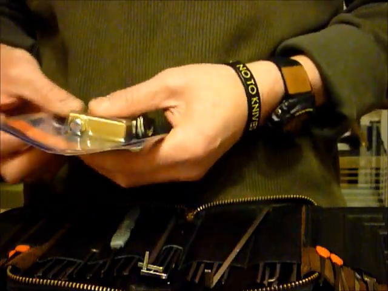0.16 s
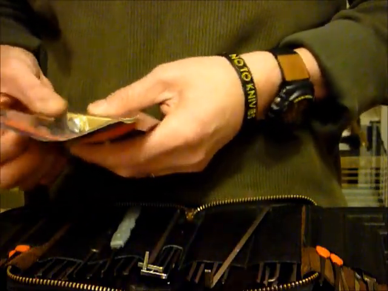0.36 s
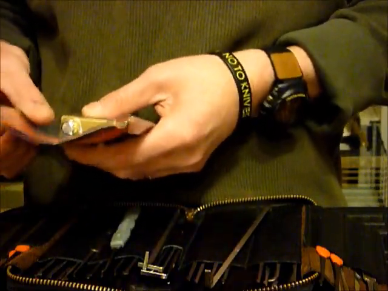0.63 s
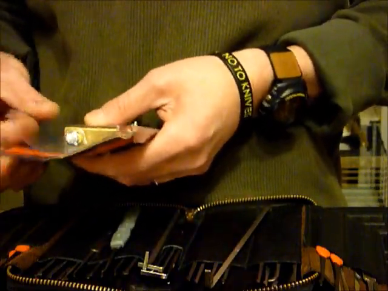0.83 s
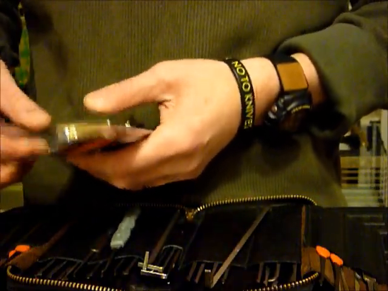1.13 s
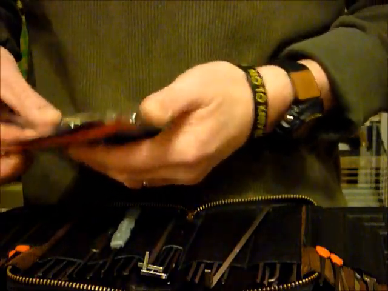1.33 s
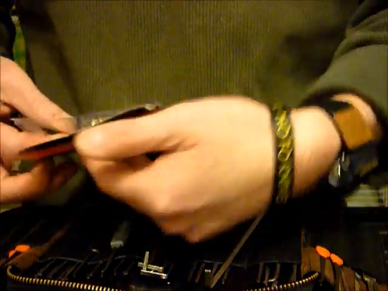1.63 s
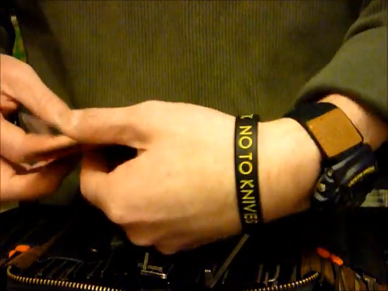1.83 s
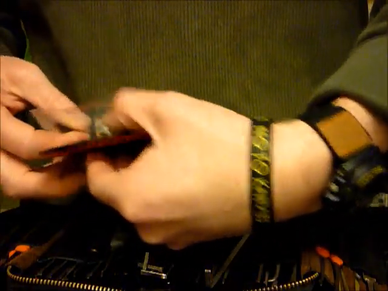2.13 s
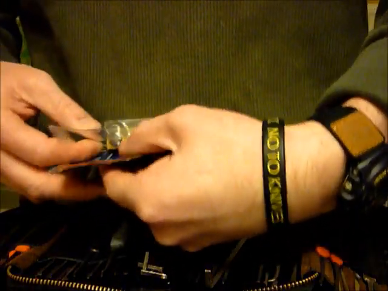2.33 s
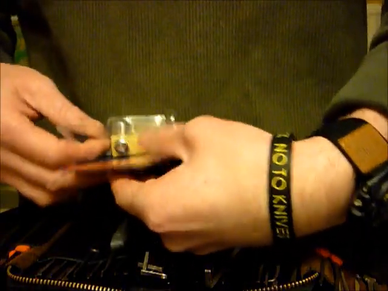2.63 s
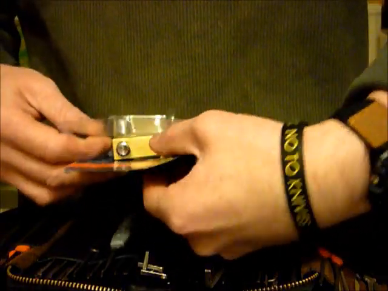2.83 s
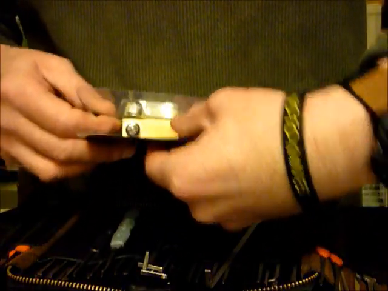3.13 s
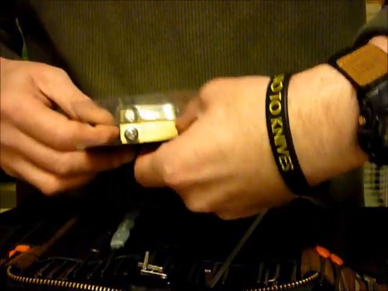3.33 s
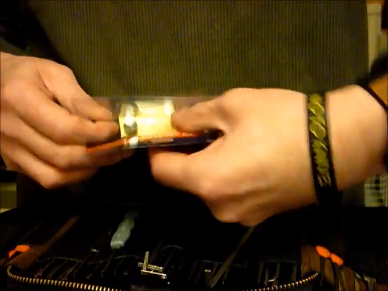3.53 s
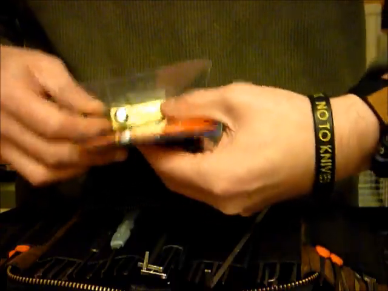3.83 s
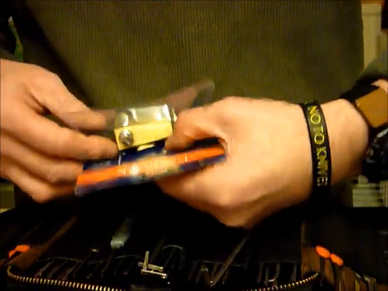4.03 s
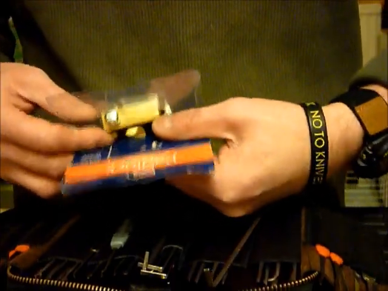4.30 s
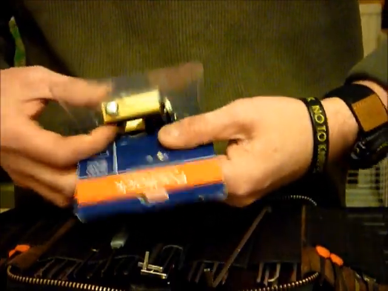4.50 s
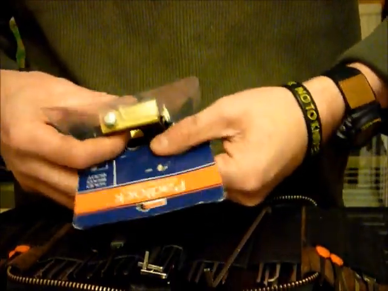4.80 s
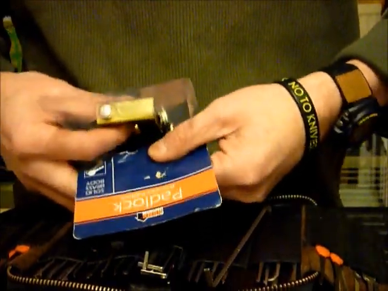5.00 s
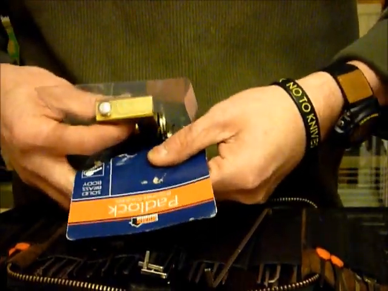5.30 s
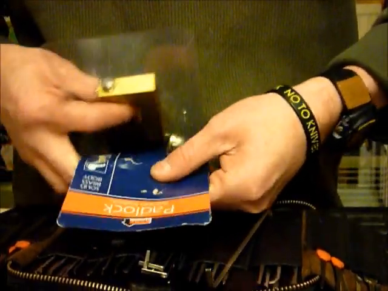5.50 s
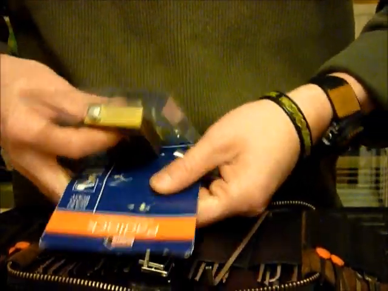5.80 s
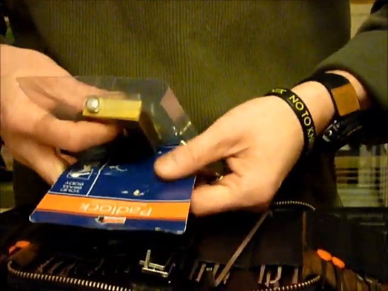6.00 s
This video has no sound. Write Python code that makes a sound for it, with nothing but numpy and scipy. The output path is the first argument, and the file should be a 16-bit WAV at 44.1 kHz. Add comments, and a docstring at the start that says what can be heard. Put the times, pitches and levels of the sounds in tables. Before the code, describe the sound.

Hands work a metal padlock out of a stiff plastic pack, heard close in a small room with a low, steady hush. For the first two seconds the shell gives light, scattered snaps, and the lock knocks hollowly on the card backing over faint finger rubbing. A hard crack with a knock lands at 2.5 seconds, followed by a brief lull. From 3.5 seconds the handling gets busier: a sharp snap and knock at 3.6, then short gritty scrapes, fine crackling and frequent clicks and bumps. Another strong snap comes at 5.1 seconds, and the loudest cracks arrive around 5.5, trailed by quick smaller snaps and scraping. From 5.6 to 6 seconds the lock slides free, its metal squeaking thin and high against the plastic edge. One soft knock ends it just after 6 seconds.

```python
"""Two hands work a padlock out of its blister pack, close up in a small, hushed room.
First the stiff plastic shell buckles in scattered snaps and the heavy lock knocks on the backing card.
A hard crack lands at 2.5 s; from 3.5 s the snaps crowd in and the plastic scrapes and crackles under
the fingers. The biggest cracks come near 5.5 s, then the lock slides free, its metal singing thinly
against the plastic edge, and one soft knock ends it."""
import sys
import numpy as np
from scipy import signal
from scipy.fft import rfft, irfft, next_fast_len
from scipy.io import wavfile

SR = 44100
rng = np.random.default_rng(int(sys.argv[2]) if len(sys.argv) > 2 else 0)


def wrap_up_sound(samples):
    """Save the sound to the file named by the first command line argument, as 16-bit audio."""
    columns = np.atleast_2d(samples).T
    # keep every value between -1 and 1, then stretch to whole-number steps
    tamed = np.clip(columns, -1, 1)
    steps = np.round(tamed * 32767).astype(np.int16)
    wavfile.write(sys.argv[1], SR, steps)


N = 271215
TIME = np.arange(N) / SR

# Table levels are relative. Tone curves of room hush, skin rub and fine crackle: f/Hz, level/dB
HUSH_EQ = [(30, -14.5), (55, -12), (136, -6.5), (232, -5.5), (525, -12), (800, -19), (1330, -17.5),
           (3000, -25), (8200, -30)]
RUB_EQ = [(120, -27.5), (300, 3), (550, 4), (800, 7.5), (1200, -6), (2000, -10.5), (4000, -39)]
CRACKLE_EQ = [(900, -2), (1800, -3), (3000, -1), (4500, -9.5), (6500, -11.5), (8000, -3)]
# the room's tail: f/Hz, level/dB, t60/s
ROOM_TAIL = [(180, -10, 0.48), (400, -6.5, 0.19), (890, -1, 0.25), (2060, -1, 0.36), (4100, -10, 0.29),
             (7600, -4, 0.34)]
# early reflections off hands and table: delay/s, level/dB
REFLECTIONS = [(.0016, -41), (.0058, -29), (.0074, -19), (0.02, -19)]
# resonances of the thin shell: f/Hz, width/Hz, boost/dB
SHELL_PEAKS = [(496, 990, 2), (2130, 410, 1.5), (4190, 3700, 13), (6270, 1400, 4)]
# modes of the card with the shell on it: f/Hz, level/dB, t60/s
CARD_MODES = [(213, -8, 0.064), (280, -3.5, 0.11), (423, -2, 0.3), (508, -2, 0.33), (629.4, -6.5, 0.35),
              (785, 2.5, 0.017), (769.3, 2.5, 0.058), (824, 5, 0.02), (1040, -23, 0.044), (1250, 10, 0.026),
              (1486, -6, 0.29), (2064, 5.5, 0.11)]
# crossovers bounding the thump, low, mid and high bands: f/Hz
CROSSOVERS_HZ = [110, 300, 1100, 3300, 8000]
# fader moves for the fingers shifting on the pack: t/s, rub/dB, crackle/dB
FINGER_LEVELS = [(0.0, -45, -52.5), (1.03, -50, -55), (1.35, -52, -55.5), (2.62, -49, -53), (3.0, -56, -58),
                 (3.54, -53.5, -62), (3.7, -46.5, -47.5), (4.02, -48, -51.5), (4.13, -39.5, -51),
                 (4.4, -54, -52.5), (5.14, -41, -52.5), (5.26, -57.5, -55), (5.48, -47, -54),
                 (5.62, -33.5, -49), (5.7, -56, -56), (5.84, -47, -46), (6.03, -56.5, -53),
                 (6.15, -75, -81)]
# plastic slides on the card: middle t/s, half length/s, level/dB, brightness/dB, panel f/Hz
SLIDES = [(0.297, 0.019, -53, -2, 2960), (0.408, 0.023, -57, 4.5, 1410), (0.6, 0.009, -59, -8, 1000),
          (0.893, .007, -52, -1, 2960), (0.929, 0.0065, -53, -13, 2960), (1.531, 0.011, -57, 8.5, 6140),
          (2.829, 0.0029, -53, -9, 2200), (3.171, 0.0081, -57, -19, 1100),
          (3.527, 0.012, -41.5, -1.5, 2800), (3.603, 0.0094, -43, -6, 2900), (3.799, 0.049, -49, -6, 2980),
          (3.93, 0.018, -50.5, -14, 3080), (4.079, 0.017, -37, -2.5, 3330), (4.126, 0.016, -48, -8, 3400),
          (4.309, 0.0086, -45, -8, 2120), (4.566, 0.0079, -48.5, -8, 2800), (4.633, .01, -45.5, -0.5, 2550),
          (5.006, 0.0083, -48, 0.5, 1390), (5.463, 0.0054, -41.5, -12, 2300),
          (5.492, 0.015, -35.5, 5, 2320), (5.594, 0.037, -42.5, 2, 3420), (5.806, 0.006, -45.5, -9, 2400),
          (5.863, 0.019, -48.5, 3, 2410)]
# stick-slip strokes on the lock's metal: t/s, length/s, f/Hz, level/dB, roughness/0-1
METAL_STROKES = [(5.605, 0.067, 7500, -50, 0.6), (5.705, 0.087, 7460, -48, 0.25),
                 (5.848, 0.045, 7540, -41.5, 0.6), (5.651, 0.077, 5700, -54.5, 0.5),
                 (5.885, 0.044, 5690, -55, 0.06), (5.953, 0.06, 5680, -60, 0.04),
                 (5.97, 0.046, 7520, -60, 0.2)]
# the lock bumps the card: t/s, level/dB, thump/dB, click/dB, knock f/Hz
LOCK_BUMPS = [(0.7185, -14, -29, -8, 520), (0.944, -8.5, -12, -6.5, 407), (1.9376, -17.5, -6, -6, 770),
              (1.945, -21, -17, -16, 780), (2.1442, -15.5, 3, -4, 640), (2.156, -15.5, -16, -11, 720),
              (2.504, 0, -1.5, -5, 1130), (2.507, -4, -17, -15, 410), (2.66, -13.5, -16, -6.5, 750),
              (3.6193, 3.5, -14.5, -13.5, 520), (3.6275, -0.5, -29, -14, 540), (4.2198, -6, -6, -12.5, 600),
              (4.557, -18, 2.5, -7, 540), (4.6697, -16, 7.5, -10, 400), (4.708, -19.5, 2.5, -19, 550),
              (4.9239, -10.5, -0.5, -6, 530), (5.111, -13.5, -11, -9.5, 720), (5.128, -10, -24, -14, 770),
              (5.224, -10, -30, -15, 780), (5.518, 5.5, -38, -7, 540), (6.0462, -20.5, -26, -9.5, 760)]
# the shell buckles: t/s, level/dB, brightness/dB, share to the card/dB, slip time/s, panel f/Hz
BUCKLES = [(0.0771, -22.5, -4.5, -0.5, 0.0024, 2950), (0.4681, -15.5, 6, -2, 0.001, 4000),
           (0.712, -9.5, -12, 1.5, 0.0032, 2900), (0.9388, -16.5, 6.5, 0, 0.0013, 2950),
           (1.1249, -24, -3, -4, 0.0084, 1430), (1.6003, -23, -9, -12, .002, 2220),
           (2.2726, -24, -4, -17, 0.0024, 1520), (2.504, 1.5, 7, -6, 0.0012, 1770),
           (2.7181, -20.5, -2, -9, 0.0023, 1490), (3.6043, -18, -7, -12, .0021, 1770),
           (3.6344, -2.5, 3.5, -18, 0.002, 3550), (3.7768, -14.5, -8, -1, 0.001, 2560),
           (3.9551, -18.5, -32, -9, .0022, 3080), (4.2112, -16, 5, -7, 0.0024, 3220),
           (4.2274, -9.5, -0.5, 0.5, 0.0028, 2960), (4.292, -17, -5, -6, 0.0022, 2070),
           (4.5155, -12.5, -3, -39, 0.0012, 2750), (4.5674, -13, -6, -5.5, 0.00082, 3400),
           (4.6694, -16.5, -6, -20, 0.00024, 3160), (4.6978, -18, -10, -10, .0018, 3540),
           (4.7764, -18.5, -0.5, -20, 0.00073, 4140), (5.0157, -15, -2, 5, 0.0017, 1350),
           (5.127, 2, -6, -1, 0.00088, 2080), (5.2428, -17.5, -3.5, -2, 0.0034, 2170),
           (5.4399, -19, 1, -1, 0.00094, 2340), (5.4726, 7.5, -6, 3.5, 0.0015, 2190),
           (5.5144, 8, 5, -8, 0.00077, 4570), (5.6338, -5, -9, 6.5, 0.0014, 3300),
           (5.654, -12.5, -8, 1, 0.00095, 1710), (5.681, -11.5, -8, -19, 0.0024, 1710),
           (5.7197, -6.5, -11, -27, 0.001, 1740), (5.8316, -13, -14, -6, 0.00091, 2420),
           (5.8586, -9, -21, -2, .0015, 2500)]


def from_db(db):
    """Decibels to gain."""
    return 10 ** (np.asarray(db) / 20)


def rms_one(x):
    """Scale to rms 1."""
    return x / np.sqrt(np.mean(x ** 2) + 1e-20)


def unit_energy(x):
    """Scale to a sum of squares of 1."""
    return x / np.sqrt(np.sum(x ** 2) + 1e-20)


def add(out, start_s, sound):
    """Drop a short sound onto the track."""
    at = max(round(start_s * SR), 0)
    out[at:at + len(sound)] += sound[:max(N - at, 0)]


def band(x, low_hz, high_hz):
    """Causal band-pass."""
    return signal.sosfilt(signal.butter(2, [low_hz, high_hz], "band", fs=SR, output="sos"), x + 1e-18)


def four_bands(x):
    """Split into thump, lows, mids and highs."""
    return [band(x, low, high) for low, high in zip(CROSSOVERS_HZ, CROSSOVERS_HZ[1:])]


def boost(x, hz, width_hz, db):
    """A bell boost: one resonance stands out."""
    return x + (from_db(db) - 1) * signal.lfilter(*signal.iirpeak(hz, hz / width_hz, fs=SR), x)


def equalise(x, curve):
    """Apply a tone curve, silent above its last point; rms 1."""
    hz, db = np.transpose(curve)
    size = next_fast_len(N)
    bins = np.maximum(np.fft.rfftfreq(size, 1 / SR), 1)
    gain = from_db(np.interp(np.log(bins), np.log(hz), db, right=-np.inf))
    return rms_one(irfft(rfft(x, size) * gain, size)[:N])


def hush(level_db):
    """A steady bed of dark room tone."""
    return from_db(level_db) * equalise(rng.standard_normal(N), HUSH_EQ)


def room(send, build_s):
    """Reflections off hands and table, then a diffuse tail that dies band by band."""
    t = TIME[:SR // 2]
    edges_hz = np.geomspace(110, 8800, 13)
    hz, db, t60 = np.transpose(ROOM_TAIL)
    response = np.zeros(len(t))
    for low, high in zip(edges_hz, edges_hz[1:]):
        log_centre = np.log(low * high) / 2
        level_db, decay_s = (np.interp(log_centre, np.log(hz), column) for column in (db, t60))
        envelope = from_db(-60 * t / decay_s) * (1 - np.exp(-t / build_s))
        tail = band(rng.standard_normal(len(t)), low, high) * envelope
        response += from_db(level_db) * np.sqrt(2 * (high - low) / SR) * unit_energy(tail)
    for delay_s, echo_db in REFLECTIONS:
        response[round(abs(delay_s) * SR)] += from_db(echo_db)
    return signal.fftconvolve(send, response)[:N]


def slips(size, per_s, spread_db):
    """Tiny stick-slip clicks at random moments, a few much louder than the rest."""
    heights = from_db(spread_db * np.minimum(rng.exponential(1, size), 4)) * rng.choice([-1, 1], size)
    return heights * (rng.random(size) < per_s / SR)


def shell(x):
    """The thin plastic adds its broad resonances."""
    for hz, width_hz, db in SHELL_PEAKS:
        x = boost(x, hz, width_hz, db)
    return x


def fingers(rub_db, crackle_db):
    """Skin rubs dully on the card while the strained shell ticks finely."""
    times, dull_db, fine_db = np.transpose(FINGER_LEVELS)
    rub = equalise(slips(N, per_s=1500, spread_db=2), RUB_EQ)
    crackle = equalise(shell(slips(N, per_s=700, spread_db=4.5)), CRACKLE_EQ)
    rub *= from_db(np.interp(TIME, times, dull_db) + rub_db)
    crackle *= from_db(np.interp(TIME, times, fine_db) + crackle_db)
    return rub + crackle


def scrapes(level_db):
    """Plastic slides on the card: a gritty swell of dense, even slips."""
    out, t = np.zeros(N), TIME[:SR // 5]
    middle = t[-1] / 2
    for peak_s, half_s, slide_db, bright_db, panel_hz in SLIDES:
        swell = np.exp(-.5 * ((t - middle) / half_s) ** 2)
        grit = slips(len(t), per_s=4500, spread_db=2.3)
        grit = boost(grit, hz=5000, width_hz=2500, db=11.5)
        grit = boost(grit, panel_hz, width_hz=630, db=9)
        low_db, high_db = -1.5 - .3 * bright_db, -2.5 + bright_db   # a brighter slide has less body
        for sign, part, db in zip((1, -1, 1), four_bands(grit)[1:], (low_db, 0, high_db)):
            add(out, peak_s - middle, sign * from_db(slide_db + db + level_db) * swell * rms_one(part))
    return out


def squeaks(level_db, flutter_hz, swing_hz, attack_s, t60_s):
    """Friction keeps a mode of the metal singing; uneven grip shakes pitch and level, then it rings out."""
    out, t = np.zeros(N), TIME[:SR // 3]
    smooth = signal.butter(2, flutter_hz, fs=SR, output="sos")
    for start_s, length_s, hz, db, roughness in METAL_STROKES:
        tremolo, vibrato = roughness * rms_one(signal.sosfilt(smooth, rng.standard_normal((2, len(t)))))
        envelope = (1 - np.exp(-t / attack_s)) * from_db(-60 * np.maximum(t - length_s, 0) / t60_s)
        tone = np.sqrt(2) * np.sin(2 * np.pi * np.cumsum(hz + swing_hz * vibrato) / SR)
        add(out, start_s, from_db(db + level_db) * envelope * (1 + tremolo) * tone)
    return out


def card_ring(t, knock_hz, vary_db, detune, db_per_octave):
    """The grip retunes the card's modes from hit to hit; those near the knock ring most."""
    hz, db, t60 = np.transpose(CARD_MODES)[:, :, None]
    hz = hz * (1 + detune * rng.standard_normal(hz.shape))
    db = db - db_per_octave * np.abs(np.log2(hz / knock_hz)) + vary_db * rng.standard_normal(hz.shape)
    modes = rng.choice([-1, 1], hz.shape) * np.sin(2 * np.pi * hz * t) * from_db(db - 60 * t / t60)
    return unit_energy(modes.sum(axis=0))


def disperse(x, hz, width_hz):
    """Bending waves cross the sheet at unequal speeds and smear the transient: an all-pass."""
    radius = np.exp(-np.pi * width_hz / SR)
    poles = [1, -2 * radius * np.cos(2 * np.pi * hz / SR), radius ** 2]
    return signal.lfilter(poles[::-1], poles, x)


def jolt(bands_db, ring_db, slip_s, knock_hz, panel_hz=None, run_on_db=-3.0, brisk_s=0.00085):
    """The pack gives with one pulse and runs on in small slips; the shell colours it, the card rings."""
    t = TIME[:SR // 8]
    run_on = unit_energy(slips(len(t), per_s=7000, spread_db=1.5) * np.exp(-t / (2 * slip_s)))
    # the slower it gives, the more crunch against the first pulse
    force = signal.unit_impulse(len(t)) + from_db(run_on_db) * slip_s / brisk_s * run_on
    force = disperse(shell(force), hz=4610, width_hz=1900)
    if panel_hz:
        force = boost(force, panel_hz, width_hz=290, db=7.5)
    force = boost(force, knock_hz, width_hz=330, db=12.5)
    sound = from_db(ring_db) * card_ring(t, knock_hz, vary_db=4.0, detune=0.018, db_per_octave=11.5)
    for sign, part, db in zip((-1, 1, -1, 1), four_bands(force), bands_db):
        sound += sign * from_db(db) * unit_energy(part)
    return sound


def knocks(hit_db, treble_db, ring_db):
    """The lock's weight shifts against the card: a thump, a hollow ring and little top end."""
    out = np.zeros(N)
    for start_s, db, thump_db, click_db, knock_hz in LOCK_BUMPS:
        bands_db = db + hit_db + np.array([thump_db, 0, click_db, click_db + treble_db])
        add(out, start_s, jolt(bands_db, db + ring_db, slip_s=0.0023, knock_hz=knock_hz))
    return out


def panel_ring(hz, width_hz, t60_s):
    """The buckled panel shivers on, its close modes dying away together."""
    t = TIME[:SR // 8]
    modes = band(rng.standard_normal(len(t)), hz - width_hz / 2, hz + width_hz / 2)
    return unit_energy(modes * from_db(-60 * t / t60_s))


def snaps(crack_db, thump_db, shiver_db):
    """A crease jumps and shakes the card behind it; returns the direct sound and its reverb send."""
    direct, send = np.zeros(N), np.zeros(N)
    for start_s, db, bright_db, share_db, slip_s, panel_hz in BUCKLES:
        card_db = db + share_db
        bands_db = np.array([card_db + thump_db, card_db, db, db + bright_db]) + crack_db
        ring_db = -5.5 + 0.53 * card_db   # held in the hand, the card's ring grows less than the blow
        snap = jolt(bands_db, ring_db, slip_s, knock_hz=740, panel_hz=panel_hz)
        shiver = from_db(db + shiver_db) * panel_ring(panel_hz, width_hz=560, t60_s=.22)
        send_db = 0.5 - 1.7 * max(db - 2, 0)   # the hardest snaps sound drier
        add(direct, start_s, snap + shiver)
        add(send, start_s, from_db(send_db) * snap)
    return direct, send


def scene():
    """The mono mix: the pack in the room over a steady hush, the metal left dry."""
    cracks, crack_send = snaps(crack_db=-1, thump_db=-29, shiver_db=-6.5)
    bumps = knocks(hit_db=1.5, treble_db=-10, ring_db=-5.5)
    friction = scrapes(level_db=0.5) + fingers(rub_db=-5.5, crackle_db=-7.5)
    metal = squeaks(level_db=3.5, flutter_hz=130, swing_hz=150, attack_s=0.0035, t60_s=0.14)
    bed = hush(level_db=-50.22)
    reverb = room(crack_send + from_db(1.5) * bumps + friction, build_s=0.0042)
    return (cracks + bumps + friction + metal + reverb + bed)[None]


def record(dry):
    """Soft-clip the sharpest snaps, trim the bass, cut the top steeply and add a small DC offset."""
    ceiling, bass_hz, top_hz, dc_offset = .72, 90, 7400, -.064
    clipped = dry / (1 + (dry / ceiling) ** 4) ** (1 / 4)
    low_cut = signal.butter(1, bass_hz, "high", fs=SR, output="sos")
    high_cut = signal.butter(22, top_hz, fs=SR, output="sos")
    return signal.sosfilt(high_cut, signal.sosfilt(low_cut, clipped)) + dc_offset


dry = scene()
out = record(dry)
wrap_up_sound(out)
```